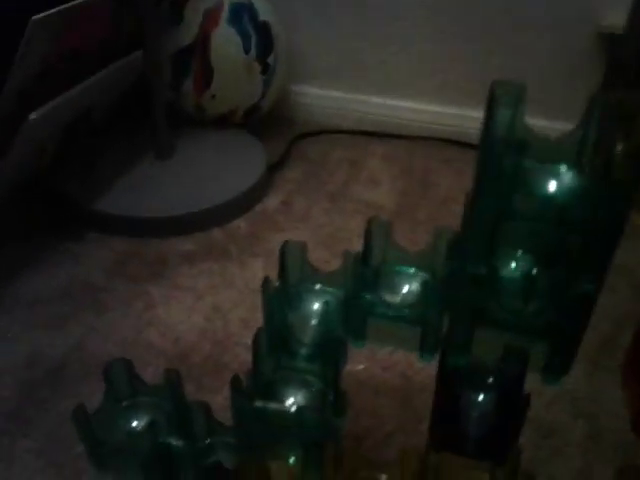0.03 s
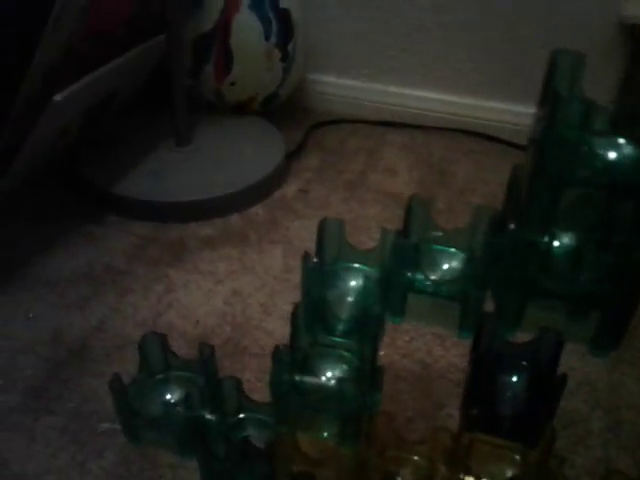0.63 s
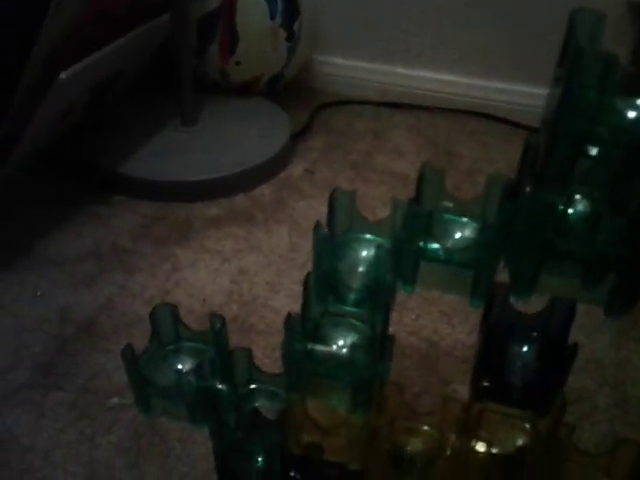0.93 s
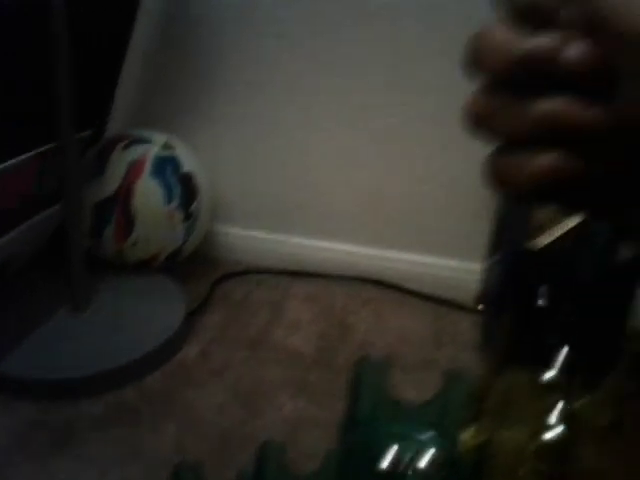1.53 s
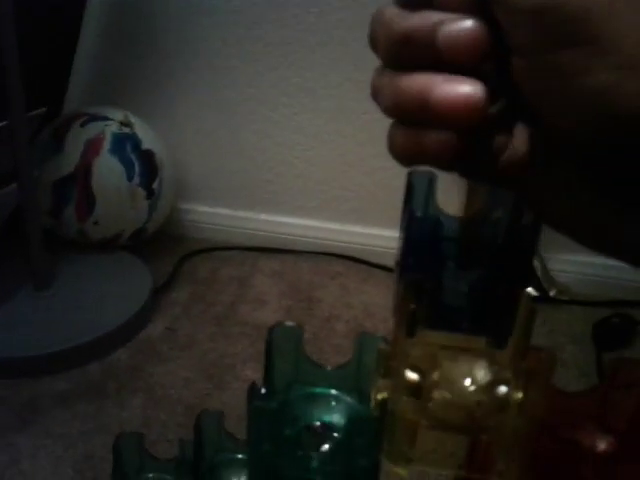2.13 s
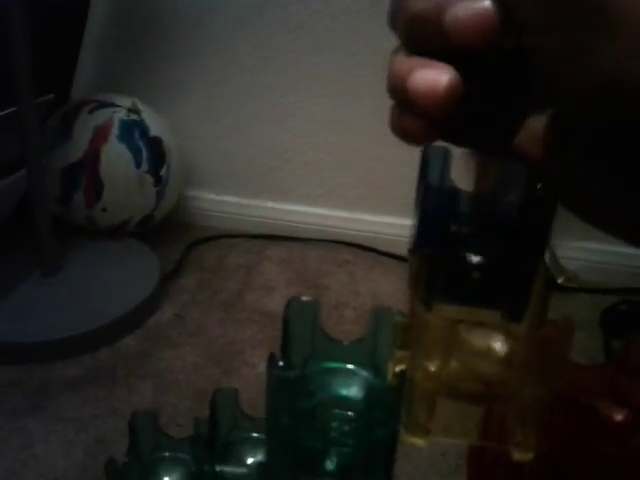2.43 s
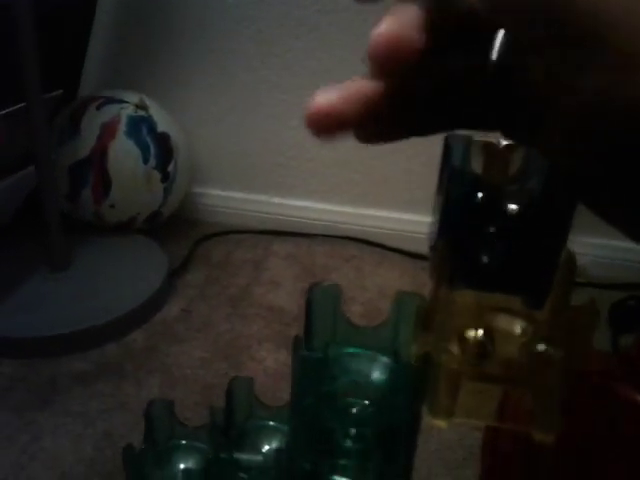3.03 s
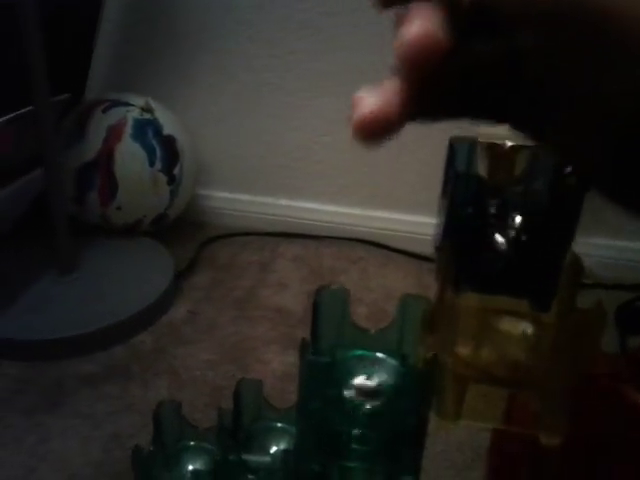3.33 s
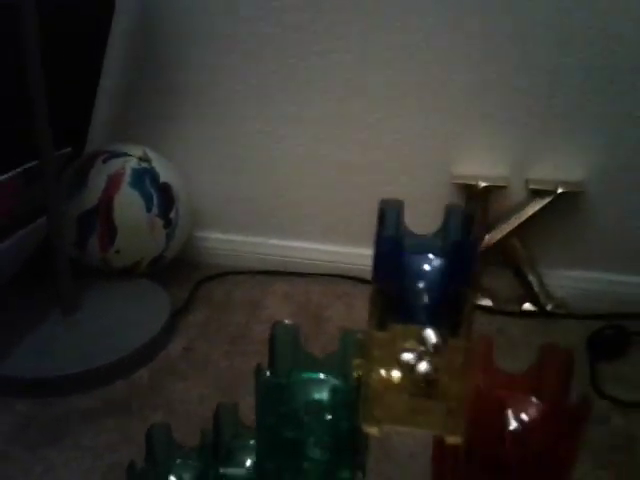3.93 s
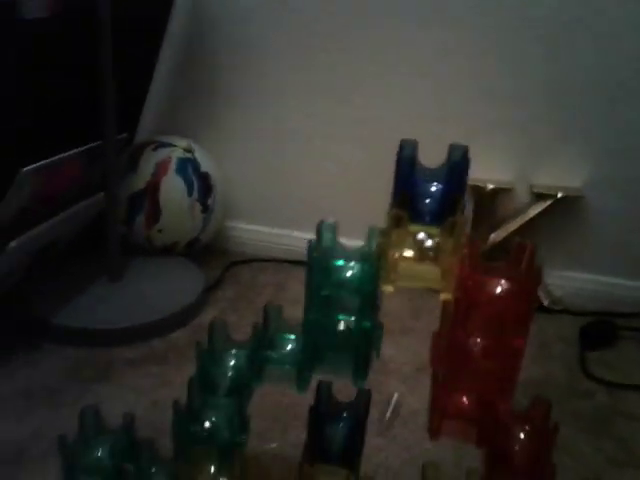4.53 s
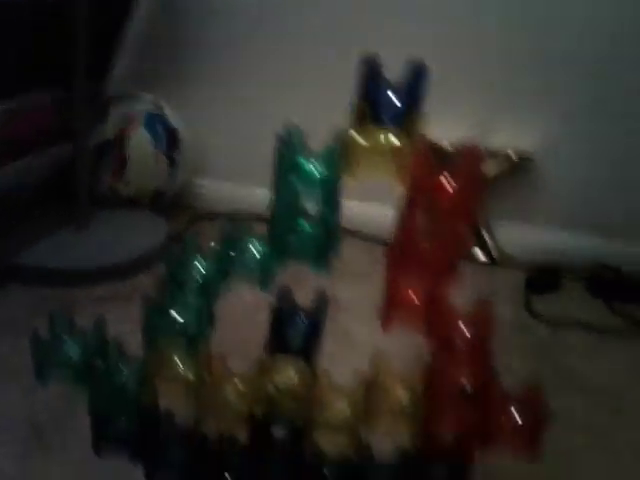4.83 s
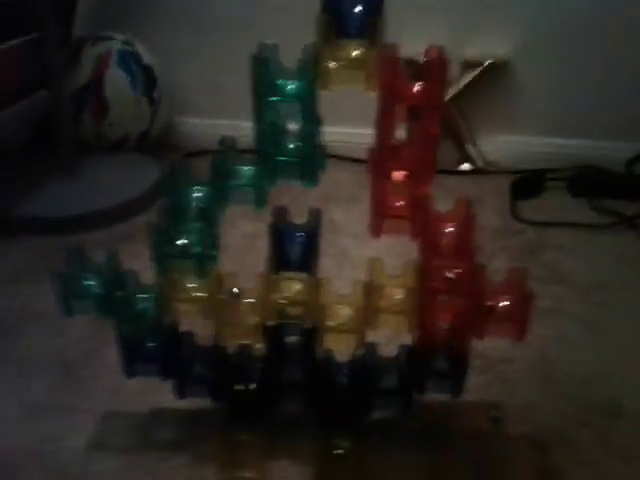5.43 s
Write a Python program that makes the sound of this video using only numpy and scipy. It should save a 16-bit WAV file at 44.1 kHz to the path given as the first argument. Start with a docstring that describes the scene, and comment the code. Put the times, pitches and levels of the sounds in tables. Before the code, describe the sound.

Close, rapid clicking and rolling of glass marbles tumbling through a plastic toy tower in a quiet room.

```python
"""Marbles clatter down the stacked pieces of a plastic marble-run tower, dropped into its top cup.
Each knock rings the thin shells for a few hundredths of a second; between knocks the marbles rattle
and roll, and some clink on a rim. Now and then the tower thuds on the carpet.
Heard close by in a small, quiet room."""
import sys
import numpy as np
from scipy import signal
from scipy.fft import rfft, irfft
from scipy.io import wavfile
from scipy.ndimage import uniform_filter1d

SR = 44100
rng = np.random.default_rng(int(sys.argv[2]) if len(sys.argv) > 2 else 0)


def wrap_up_sound(samples):
    """Save the sound to the file named by the first command line argument, as 16-bit audio."""
    columns = np.atleast_2d(samples).T
    # keep every value between -1 and 1, then stretch to whole-number steps
    tamed = np.clip(columns, -1, 1)
    steps = np.round(tamed * 32767).astype(np.int16)
    wavfile.write(sys.argv[1], SR, steps)


N = 250047
TIME_S = np.arange(N) / SR
AGE_S = np.arange(int(0.12 * SR)) / SR  # time since a blow
SPLIT_HZ, TOP_HZ = 4300, 15900  # bass/treble split, upper band edge

# Single knocks. Each row: start in seconds, level in dB, treble in dB relative to that level.
KNOCKS = [(0.148, -25, -1), (0.503, -19.5, -1.5), (0.5162, -24, -3), (0.5455, -27.5, -2.5),
          (0.8211, -24.5, -3), (0.8356, -18.5, -4), (0.848, -17, -3.5), (0.9867, -21.5, -11),
          (1.0032, -19.5, -0.5), (1.0635, -17.5, 2.5), (1.1333, -16, 0), (1.145, -19.5, 2),
          (1.1857, -20, -3), (1.204, -19, 4.5), (1.391, -25, 7), (1.3986, -21, -1), (1.5109, -22, -3.5),
          (1.5821, -21.5, -2.5), (1.931, -17.5, 0), (2.086, -19, -1.5), (2.128, -32.5, 8),
          (2.1502, -14, 0.5), (2.1757, -19, -3.5), (2.214, -20, -6), (2.2364, -24.5, -0.5),
          (2.506, -20.5, -2), (2.5418, -21, -12), (2.595, -19, 2), (2.6081, -23.5, -1), (2.6606, -17.5, 5),
          (2.734, -16, -3.5), (2.7579, -19, -2.5), (2.8228, -23, -9), (2.865, -18, -31), (2.9281, -19, -7),
          (2.9875, -15.5, -1), (3.0225, -14, -2.5), (3.0918, -16, -0.5), (3.1876, -17, -3.5),
          (3.2558, -18, -4), (3.281, -16.5, -3), (3.3124, -23, 3.5), (3.4094, -17.5, -1), (3.4348, -23, 1),
          (3.5106, -28.5, 5), (3.6778, -18, -1.5), (3.6986, -13, -3.5), (3.7748, -18, -8),
          (3.883, -24.5, 2.5), (3.9163, -17, -4.5), (4.037, -21, -0.5), (4.0815, -25, 10.5),
          (4.1397, -24.5, 0.5), (4.192, -19.5, -1), (4.292, -16.5, -0.5), (4.3256, -20, -4),
          (4.3821, -17.5, -4), (4.4483, -19.5, -4.5), (4.7365, -27.5, 1), (4.7503, -23.5, -7),
          (4.7843, -26.5, 0.5), (4.8749, -20.5, -1.5), (4.9152, -28, 0), (4.9688, -26, -1.5),
          (5.0018, -23.5, 2), (5.094, -26, 2), (5.174, -26, 8.5), (5.1815, -17.5, 3.5), (5.3974, -28, 5)]
# Bouncing marbles. Each row: start in seconds, level in dB, relative treble in dB,
# first flight in seconds, ratio of each flight to the last, loss per bounce in dB, number of blows.
BOUNCES = [ (.141, -24.5, -3, .066, .65, .2, 3), (.5806, -20.5, -1, .0315, .99, 2.6, 4),
           (.721, -24, -11, .034, .8, 1.1, 3), (.8845, -19.5, -1, .0355, .65, 0, 4),
           (1.2529, -17, -2, .0438, .7, 1, 4), (1.5695, -20.5, -2, .0402, .985, .7, 5),
           (1.8098, -14.5, -2, .042, .87, 1.4, 4), (2.3406, -16, 0, .0544, .95, .3, 3),
           (3.5506, -15.5, -1, .0452, .8, 2.4, 3), (4.172, -17.5, -1, .052, .9, .7, 3),
           (5.469, -21, 2, .0312, .98, 1.1, 4), ]
def knocks(ring_db=-1, ring_db_per_db=0.4):
    """Marbles drop from piece to piece; hard blows are mostly clack, light ones mostly ring."""
    starts_s, level_db, treble_db = landings().T
    softness_db = (np.median(level_db) - level_db)[:, None]
    return strike(starts_s, level_db, treble_db, ring_db + ring_db_per_db * softness_db)


def landings():
    """All single and bounced blows. Each row: start in seconds, level in dB, relative treble in dB."""
    return np.vstack([KNOCKS] + [bounce(*row) for row in BOUNCES])


def bounce(start_s, level_db, treble_db, flight_s, restitution, loss_db, blows):
    """Landings of one marble; it loses speed at each, so the flights shorten."""
    index = np.arange(round(blows))
    flights_s = flight_s * restitution ** index
    starts_s = start_s + np.cumsum(flights_s) - flights_s
    return np.column_stack([starts_s, level_db - loss_db * index, np.full(len(index), treble_db)])


def strike(starts_s, level_db, treble_db, ring_db, tick_db=-1):
    """Marble on plastic: a tick, a short clack, then the ring of the part it has reached."""
    bass, treble = shell_clacks(len(starts_s))
    treble = treble + undb(tick_db) * ticks(len(starts_s))
    body = bass + undb(ring_db) * tower_rings(starts_s)
    blows = unit_attack(body) + undb(treble_db)[:, None] * unit_attack(treble)
    return place(starts_s, undb(level_db)[:, None] * blows)


# Response of the plastic. Each row: frequency in Hz, gain in dB.
SHELL_EQ = [(45, -54), (150, -30), (250, -13), (450, -16), (900, -8), (1450, -1.5), (2350, -1.5), (2900, 3),
            (4450, -13), (5700, 1), (7400, -3.5), (9800, -18.5), (12500, -21.5), (15500, -55)]
def shell_clacks(count, n_modes=560, spread_s=0.0011, patch_db=4.5, patch_hz=380):
    """Bass and treble of blows on the shells' crowded modes; most die fast, some linger."""
    hz = TOP_HZ * ((np.arange(n_modes) + rng.random(n_modes)) / n_modes) ** 1.3
    decay_scatter = 0.3 * np.clip(rng.standard_normal(n_modes), -2, 2)
    t60_s = 0.029 * np.exp(decay_scatter - hz / TOP_HZ / 2)
    modes = ring(hz, t60_s, rng.uniform(0, 2 * np.pi, (n_modes, 1)))
    onset = 1 - np.exp(-AGE_S / spread_s)  # the bending wave spreads over the piece
    spacing_hz = np.gradient(hz)[:, None]
    modes = colour(modes * np.sqrt(spacing_hz) * onset, SHELL_EQ)
    # each contact point favours its own groups of modes; long low waves hardly care
    patches = np.exp(-((hz[:, None] - np.linspace(0, TOP_HZ, n_modes)) / patch_hz) ** 2)
    patches *= (np.tanh(hz / 1500) / np.linalg.norm(patches, axis=1))[:, None]
    polarity, strength = rng.standard_normal((count, 2, n_modes)).swapaxes(0, 1)
    weights = np.sign(polarity) * undb(patch_db * strength @ patches.T)
    return [unit_attack(weights[:, band] @ modes[band]) for band in (hz < SPLIT_HZ, hz >= SPLIT_HZ)]


def ticks(count, decay_s=0.00077):
    """The hard instant of glass contact: a bright noise burst."""
    burst = rng.standard_normal((count, len(AGE_S))) * np.exp(-AGE_S / decay_s)
    return unit_attack(colour(burst, [(300, -14), (2500, -9.5), (7000, 10), (12000, -15)]))


# Path of the marbles. Each row: time in seconds, depth from 0 (top cups) to 1 (lower track).
DESCENT = [(1.2, 0.021), (3.2, 0.36), (4.4, 0.53), (5.3, 0.67)]
# Modes of the cups and the track. Each row: frequency in Hz, relative level in dB, T60 in seconds.
CUP_MODES = [(1406, -12, 0.11), (1581, -3, 0.026), (2030, 2, 0.019), (2073.4, -3, 0.072),
             (2780, -9.5, 0.03), (3430, -0.5, 0.013), (6390, -14, 0.036)]
TRACK_MODES = [(1206, -43, 0.1), (1588, -13, 0.021), (1794, 0, 0.015), (2490, -7, 0.04), (7700, -33, 0.025)]
def tower_rings(starts_s):
    """The ring passes from the cups to the track as the marbles descend."""
    depth = curve(DESCENT, starts_s)[:, None]
    cups = piece_rings(CUP_MODES, len(starts_s))
    track = piece_rings(TRACK_MODES, len(starts_s))
    return np.sqrt(1 - depth) * cups + np.sqrt(depth) * track


def piece_rings(modes, count, scatter_db=5):
    """The few sharp modes of a piece, weighted differently at each blow."""
    hz, level_db, t60_s = np.transpose(modes)
    polarity, strength = rng.standard_normal((count, 2, len(hz))).swapaxes(0, 1)
    weights = np.sign(polarity) * undb(level_db + scatter_db * strength)
    return weights @ radiate(ring(hz, t60_s))


def radiate(x, cutoff_hz=800):
    """Takes the bass out of the rings, so they sound only near their own pitches."""
    return signal.sosfilt(signal.butter(2, cutoff_hz, "high", fs=SR, output="sos"), x)


def shading(x):
    """Low in the tower, pieces in the way reshape the treble: two dips with a peak between."""
    share = curve(DESCENT, TIME_S) ** 2
    shaded = colour(x, [(3000, 1.5), (4400, -7), (6000, -1.5), (8500, 7), (10500, -7)])
    return (1 - share) * x + share * shaded


# Envelope of rattle and rolling. Each row: time in seconds, base level in dB.
ROLL_LEVEL = [(0.26, -42), (0.48, -65.5), (0.56, -50), (0.8, -66), (1.0, -37), (1.42, -27.5), (1.55, -39.5),
              (1.9, -28), (2.06, -31), (2.35, -28), (3.08, -24), (3.37, -31.5), (3.5, -25.5), (4.35, -28.5),
              (4.68, -41.5), (4.9, -34), (5.15, -32.5), (5.6, -30)]
def rattle(gain_db=-3, scatter_db=4, treble_db=-7.5, treble_scatter_db=5, hardening=0.34, slots=640):
    """Small hops and grazes of running marbles; gentle touches last longer, so sound duller."""
    starts_s = (np.arange(slots) + rng.random(slots)) / slots * N / SR
    starts_s = starts_s[starts_s > ROLL_LEVEL[0][0]]
    force, hardness = np.clip(rng.standard_normal((len(starts_s), 2)).T, -2, 2)
    level_db = curve(ROLL_LEVEL, starts_s) + contact_db(starts_s) + gain_db + scatter_db * force
    bright_db = treble_db + treble_scatter_db * hardness + hardening * (level_db - np.median(level_db))
    return strike(starts_s, level_db, bright_db, ring_db=2)


def rolling(gain_db=-11, rough_db=4, smooth_samples=200):
    """Glass rolls on plastic with a fine, uneven scratch."""
    pressure = unit_rms(uniform_filter1d(rng.standard_normal(N), smooth_samples))
    friction = rng.standard_normal(N) * undb(rough_db * pressure)
    scratch = unit_rms(colour(friction, SHELL_EQ))
    level_db = curve(ROLL_LEVEL, TIME_S) + contact_db(TIME_S) + gain_db
    return scratch * undb(level_db) * (TIME_S > ROLL_LEVEL[0][0])


def contact_db(time_s, flight_s=0.013, flight_db=-10, jostle_db=3, settle_s=0.047):
    """A marble is airborne just before it lands and jostles the others just after."""
    landings_s = np.concatenate([[-np.inf], np.sort(landings()[:, 0]), [np.inf]])
    following = np.searchsorted(landings_s, time_s)
    until_s = landings_s[following] - time_s
    since_s = time_s - landings_s[following - 1]
    return flight_db * np.exp(-(until_s / flight_s) ** 2) + jostle_db * np.exp(-since_s / settle_s)


# Rim hits. Each row: start in seconds, frequency in Hz.
CLINKS = [(0.944, 2720), (3.511, 1240), (4.081, 3600), (4.192, 1145), (4.737, 2500), (4.875, 1854),
          (5.001, 1220), (5.172, 7540)]
def clinks(gain_db=-12, t60_s=0.02):
    """A marble catches a rim and rings a single mode of that piece."""
    starts_s, hz = np.transpose(CLINKS)
    return place(starts_s, undb(gain_db) * radiate(ring(hz, t60_s)))


# Tower on carpet. Each row: start in seconds, gain in dB.
THUDS = [(2.624, -17.5), (2.792, -15), (3.908, -13.5), (4.768, -21)]
def thuds(modes_hz=(235, 320), t60_s=0.043, rise_s=0.015):
    """The whole stack rocks on the carpet in two low modes."""
    starts_s, gain_db = np.transpose(THUDS)
    thud = ring(modes_hz, t60_s).sum(axis=0) * (1 - np.exp(-AGE_S / rise_s))
    return place(starts_s, undb(gain_db)[:, None] * thud)


def room(x, wall_s=0.013, smear_s=0.0063, wall_db=-11.66, tail_db=-9.16, t60_s=0.21, build_s=0.003):
    """Adds a scattered echo off the near wall and the short tail of a carpeted room."""
    lag_s = np.arange(SR // 2) / SR
    tail = rng.standard_normal(len(lag_s)) * undb(-60 * lag_s / t60_s) * (1 - np.exp(-lag_s / build_s))
    wall = rng.standard_normal(len(lag_s)) * np.exp(-((lag_s - wall_s) / smear_s) ** 2)
    response = undb(tail_db) * tail / np.linalg.norm(tail) + undb(wall_db) * wall / np.linalg.norm(wall)
    response = colour(response, [(7000, 0), (14000, -2.84)])
    return x + signal.fftconvolve(x, response)[:N]


# Room noise spectrum. Each row: frequency in Hz, relative density in dB.
AIR_EQ = [(25, -15), (60, -1.5), (160, 0.5), (420, -5.5), (15000, -34)]
def room_air(rms_db=-60):
    """Still room air: faint, steady, low noise."""
    return undb(rms_db) * unit_rms(colour(rng.standard_normal(N), AIR_EQ))


def undb(db):
    """Decibels to gain."""
    return 10 ** (np.asarray(db) / 20)


def unit_rms(x):
    """Scale to RMS 1."""
    return x / np.sqrt(np.mean(x ** 2))


def unit_attack(sounds, attack_s=0.006):
    """Scale each row to RMS 1 over its attack."""
    return sounds / np.sqrt(np.mean(sounds[:, :int(attack_s * SR)] ** 2, axis=1, keepdims=True))


def curve(rows, time_s):
    """Interpolate rows of time in seconds and value."""
    return np.interp(time_s, *np.transpose(rows))


def colour(x, points, size=2048):
    """Minimum-phase filter on the last axis. Each point: frequency in Hz, gain in dB."""
    hz, db = np.transpose(points)
    bins_hz = np.maximum(np.fft.rfftfreq(size, 1 / SR), 1)
    gain = undb(np.interp(np.log(bins_hz), np.log(hz), db))
    cepstrum = irfft(np.log(gain))
    cepstrum[1:size // 2] *= 2
    cepstrum[size // 2 + 1:] = 0
    response = irfft(np.exp(rfft(cepstrum)))[:size // 2]
    return signal.fftconvolve(x, np.array(response, ndmin=x.ndim), axes=-1)[..., :x.shape[-1]]


def ring(hz, t60_s, phase_rad=0):
    """One decaying sine per row."""
    envelope = undb(-60 * AGE_S / np.reshape(t60_s, (-1, 1)))
    return np.sin(2 * np.pi * np.outer(hz, AGE_S) + phase_rad) * envelope


def place(starts_s, sounds):
    """Sum the sounds at their start times."""
    mix = np.zeros(N + len(AGE_S))
    for start, sound in zip(np.clip(starts_s * SR, 0, N - 1).astype(int), sounds):
        mix[start:start + len(sound)] += sound
    return mix[:N]


def scene():
    """The running tower in its room, mono."""
    marbles = shading(knocks() + rattle() + rolling()) + clinks()
    return (room(marbles + thuds()) + room_air())[None]


def record(dry, low_cut_hz=45):
    """The microphone drops the deep bass, rounds the highest peaks and cuts the top."""
    trimmed = signal.sosfilt(signal.butter(2, low_cut_hz, "high", fs=SR, output="sos"), dry)
    rounded = trimmed / (1 + trimmed ** 4) ** (1 / 4)
    return signal.sosfilt(signal.ellip(10, .2, 70, TOP_HZ, fs=SR, output="sos"), rounded)


dry = scene()
out = record(dry)
wrap_up_sound(out)
```